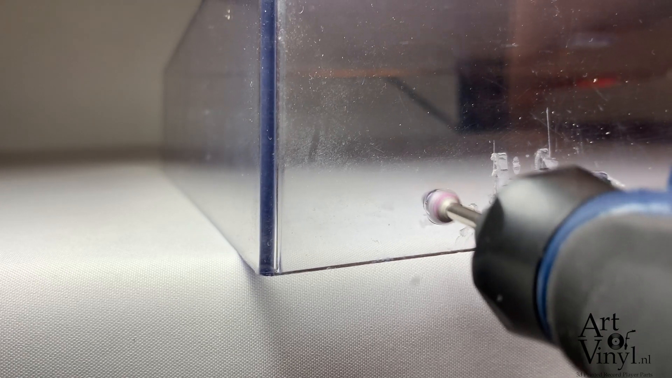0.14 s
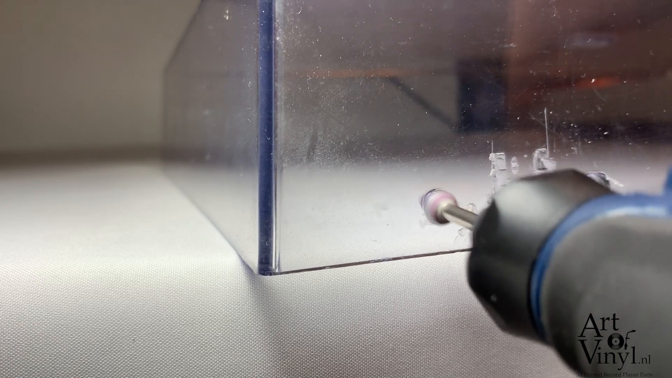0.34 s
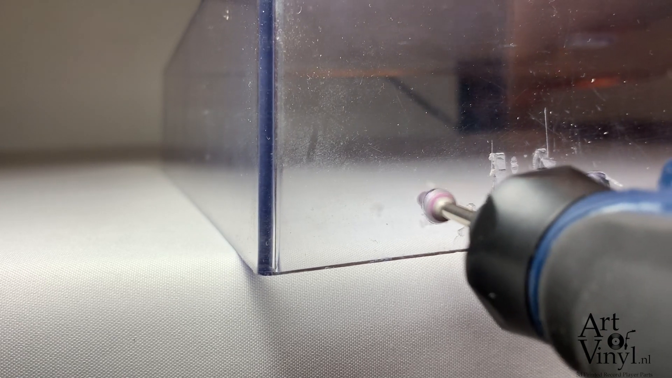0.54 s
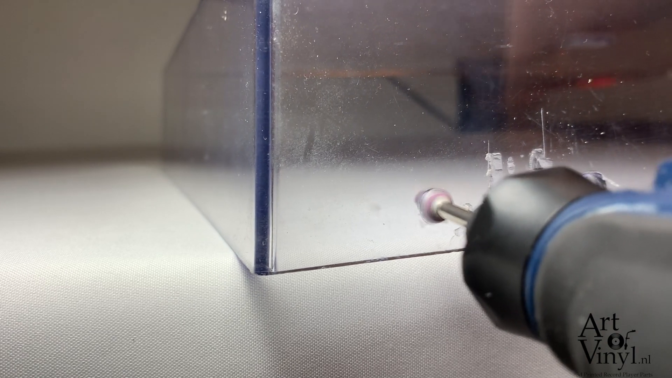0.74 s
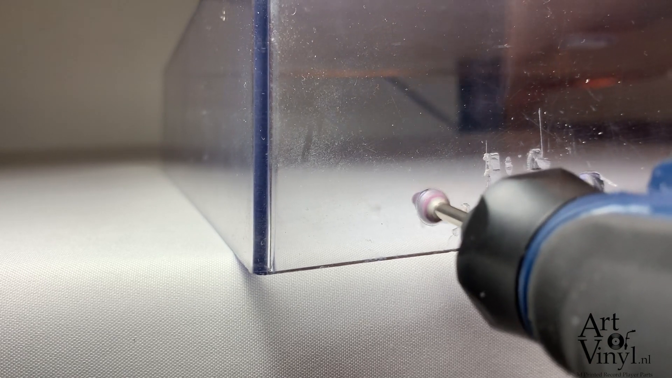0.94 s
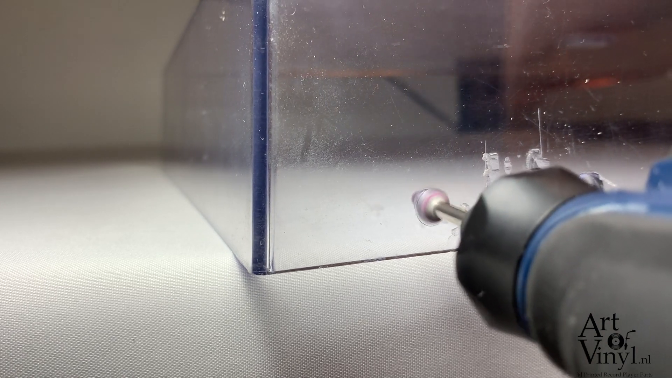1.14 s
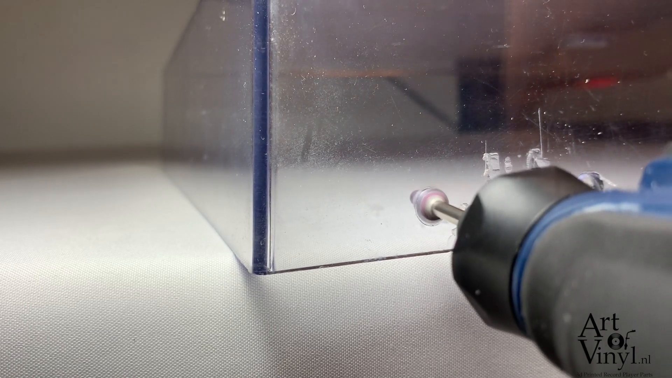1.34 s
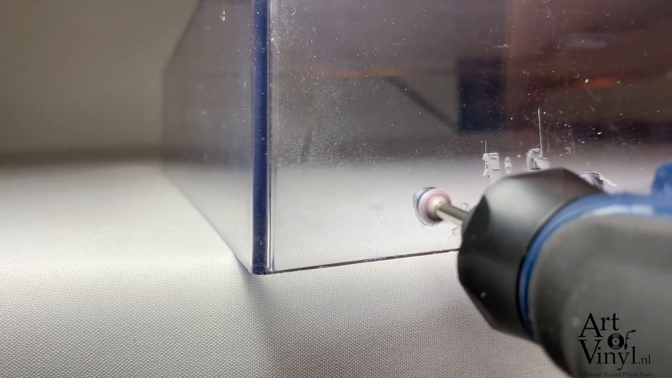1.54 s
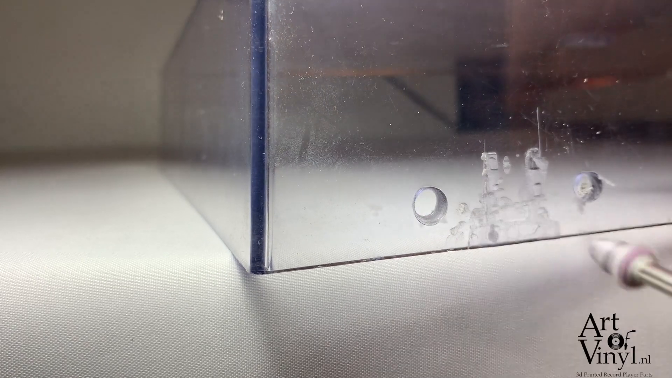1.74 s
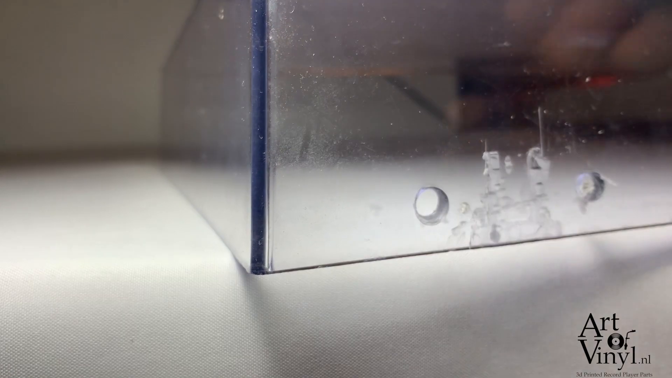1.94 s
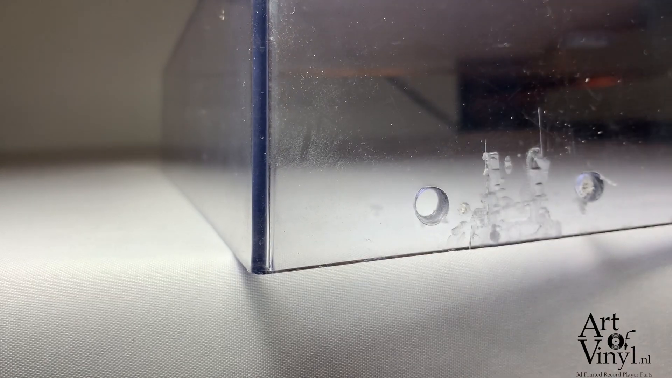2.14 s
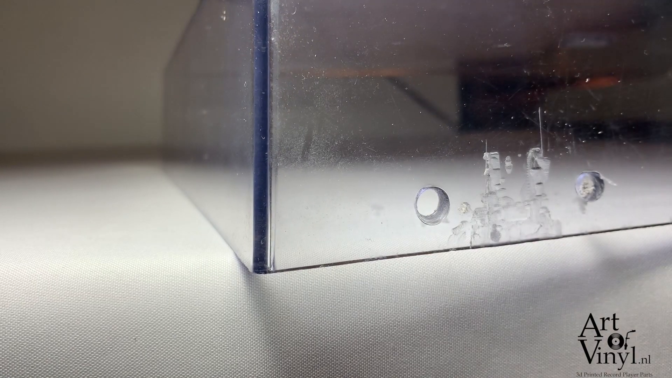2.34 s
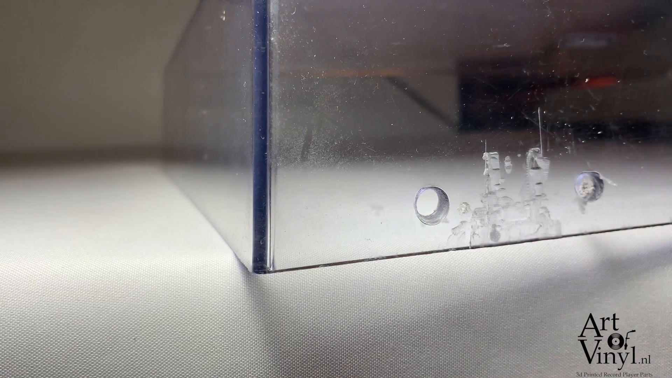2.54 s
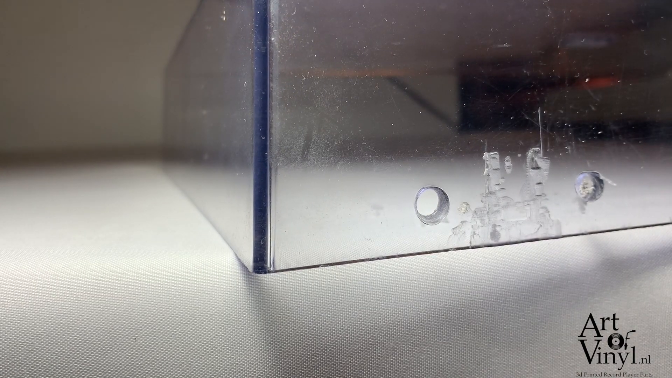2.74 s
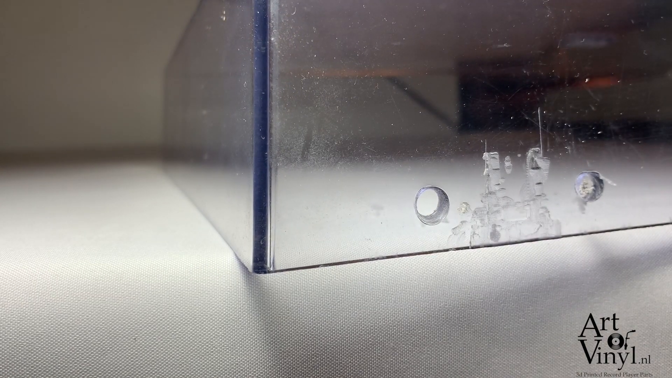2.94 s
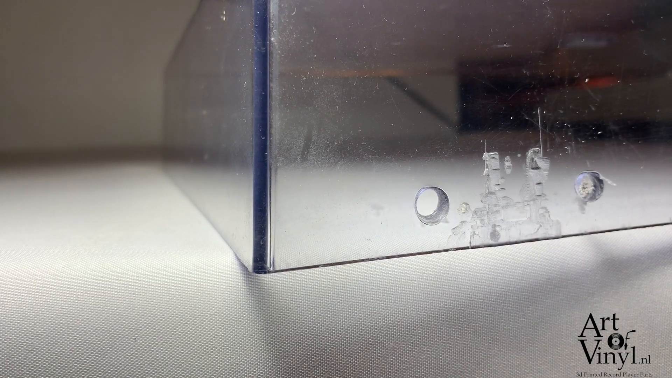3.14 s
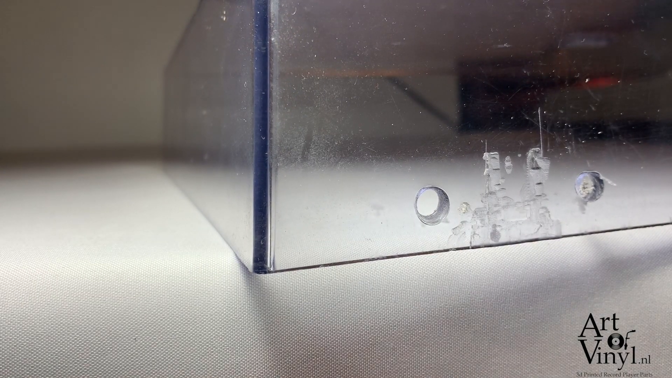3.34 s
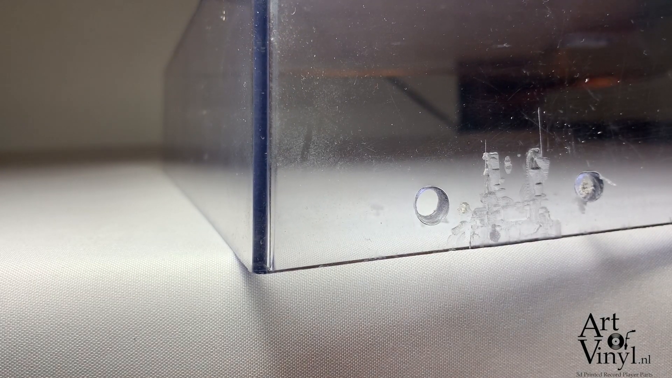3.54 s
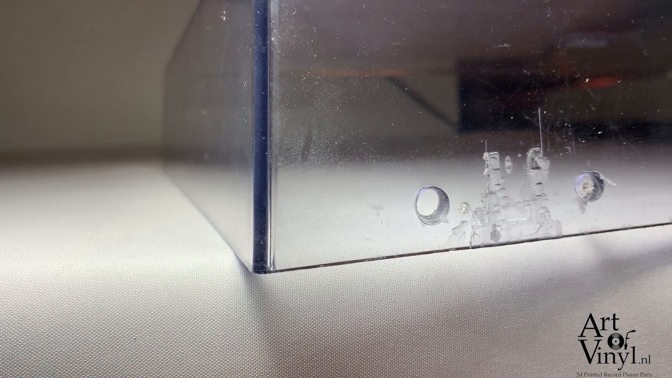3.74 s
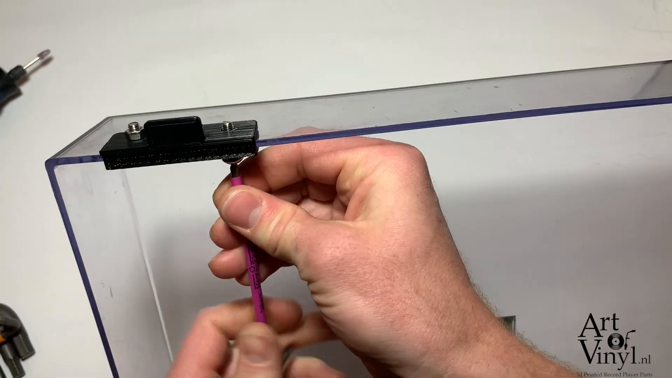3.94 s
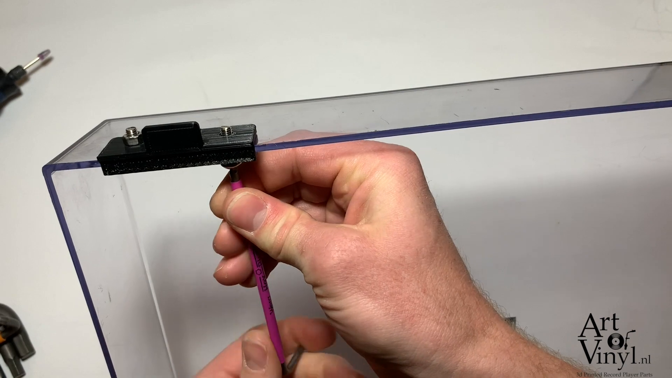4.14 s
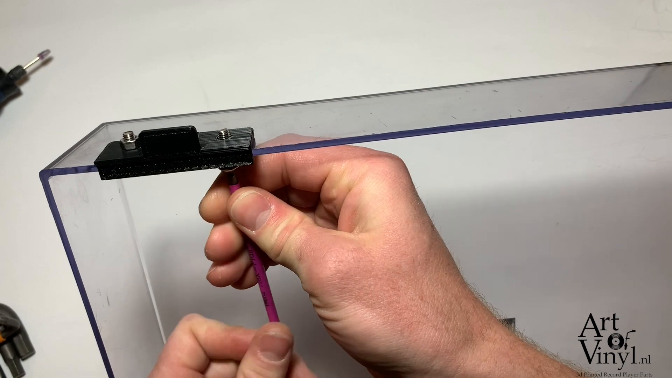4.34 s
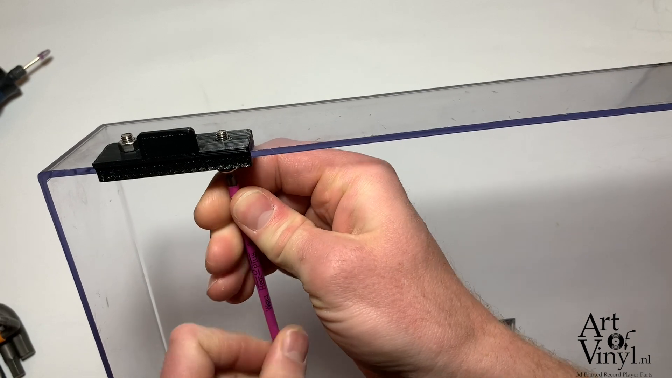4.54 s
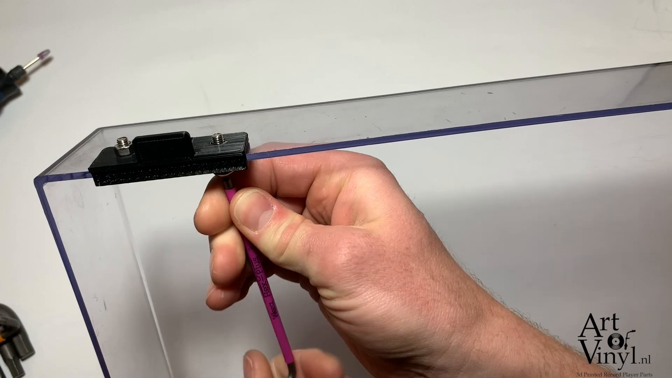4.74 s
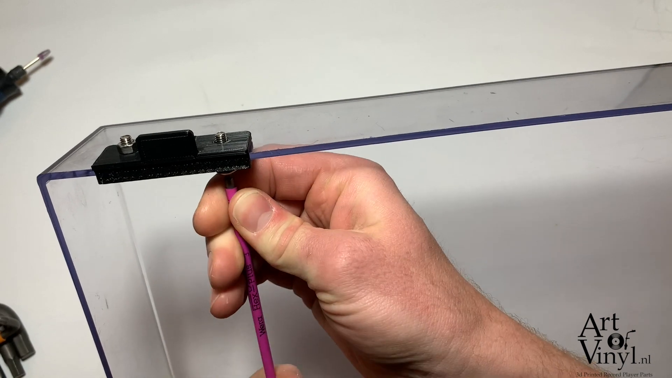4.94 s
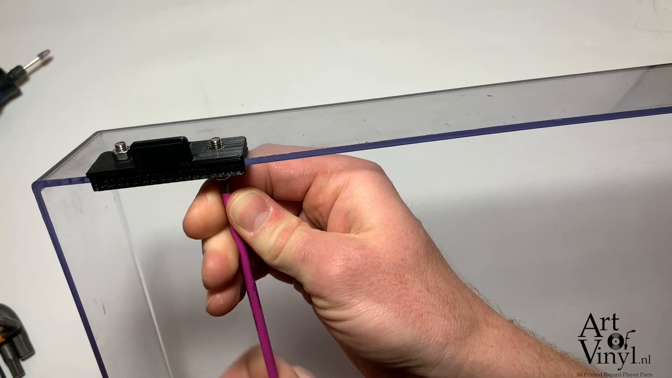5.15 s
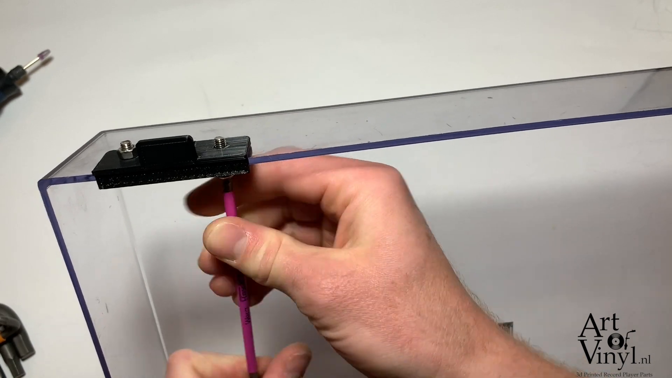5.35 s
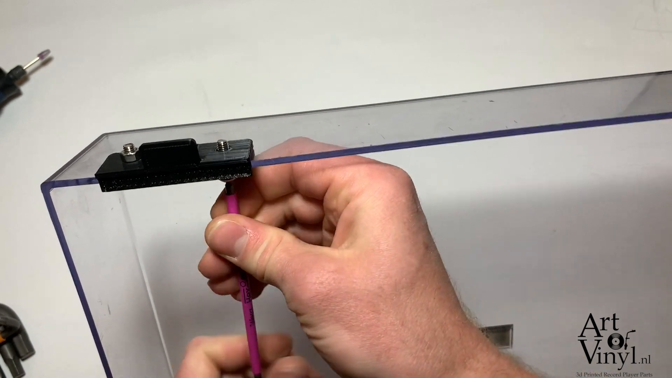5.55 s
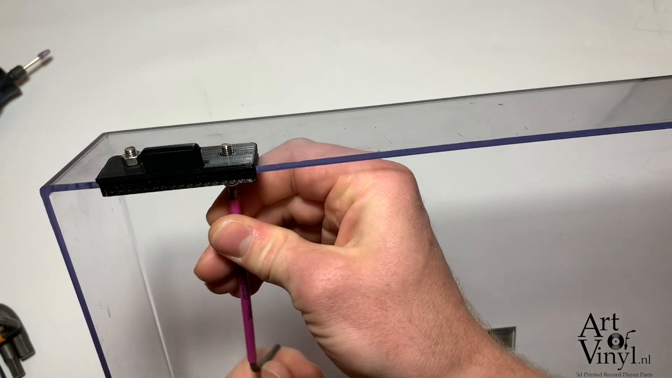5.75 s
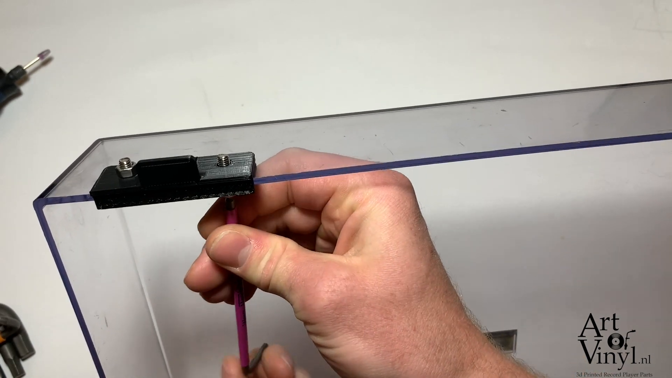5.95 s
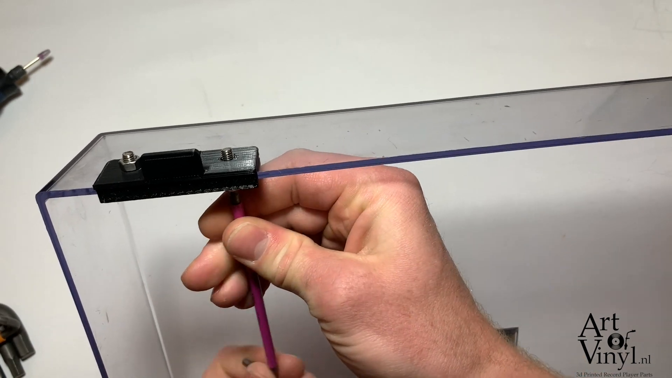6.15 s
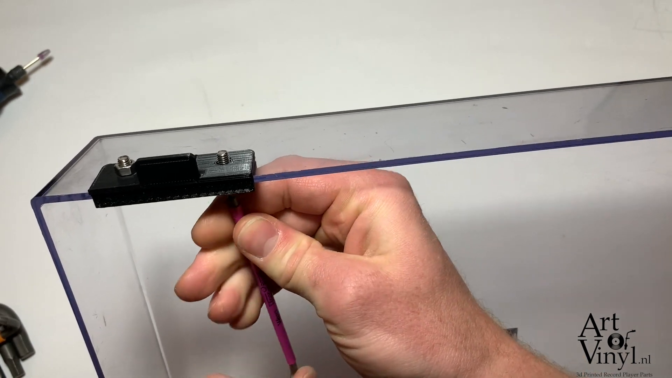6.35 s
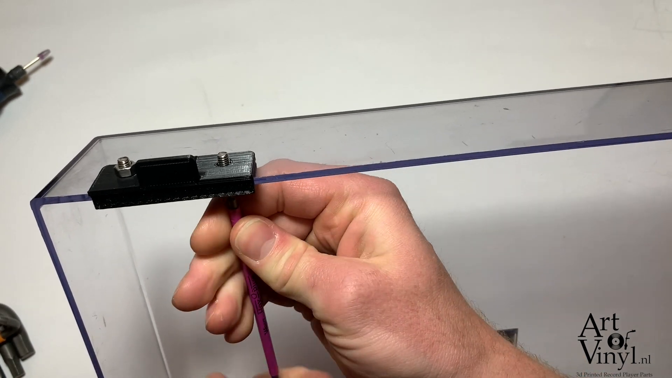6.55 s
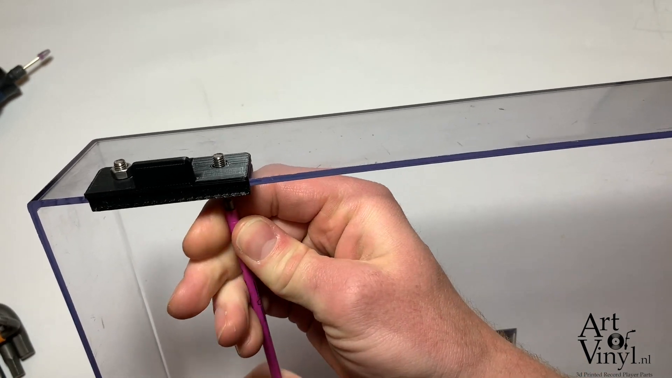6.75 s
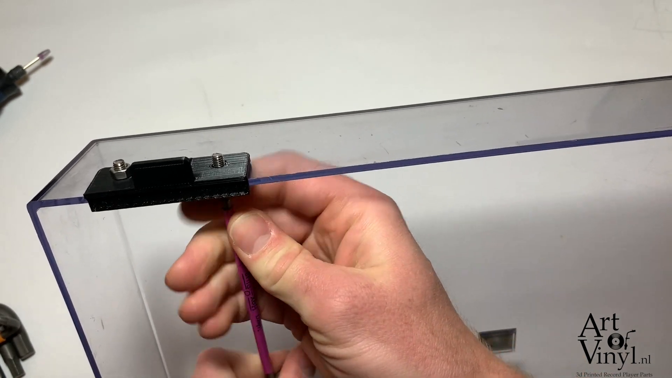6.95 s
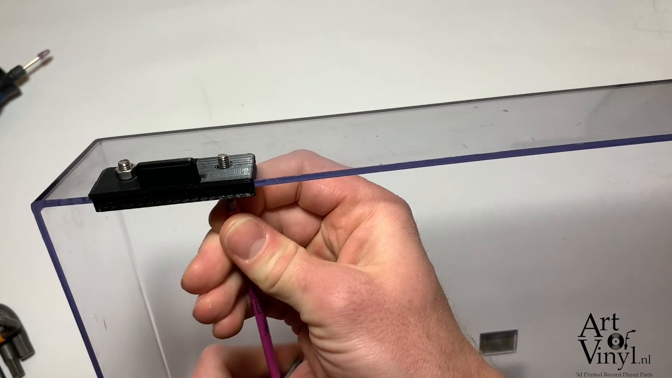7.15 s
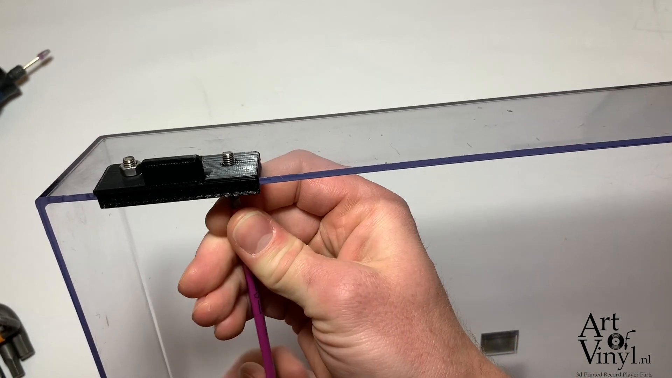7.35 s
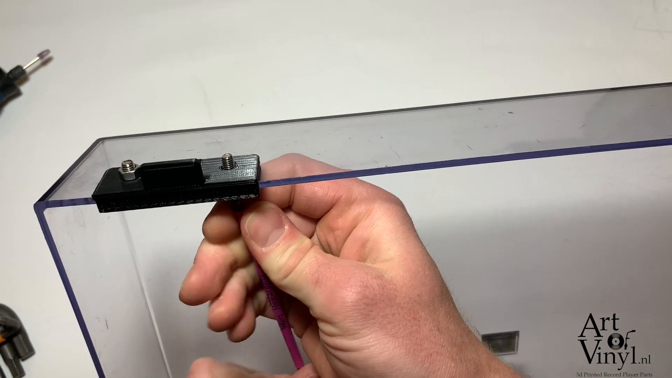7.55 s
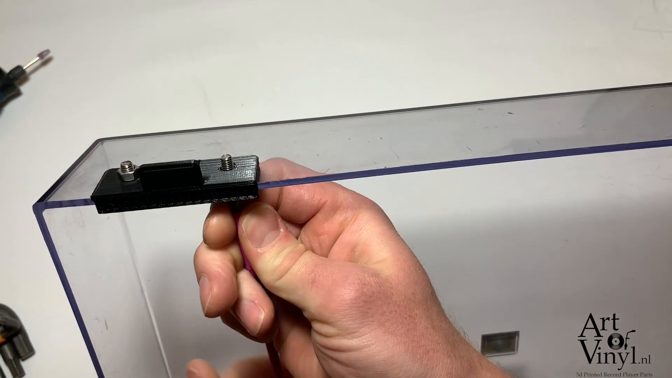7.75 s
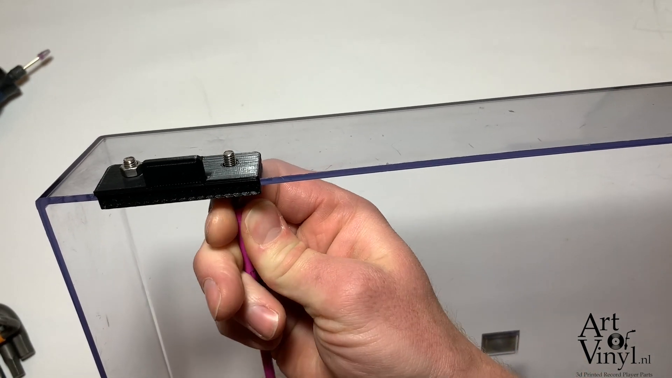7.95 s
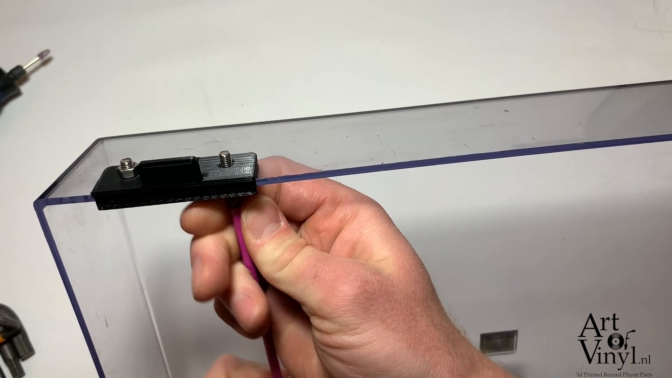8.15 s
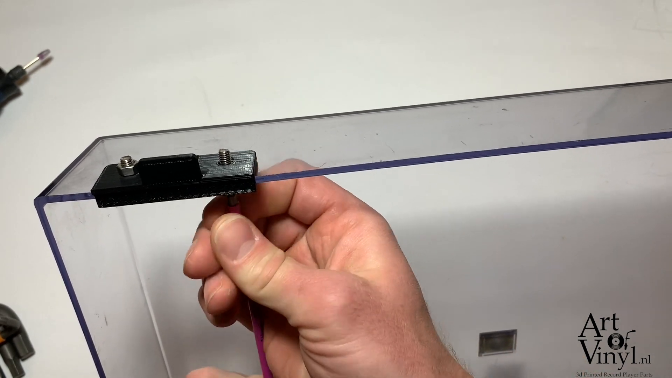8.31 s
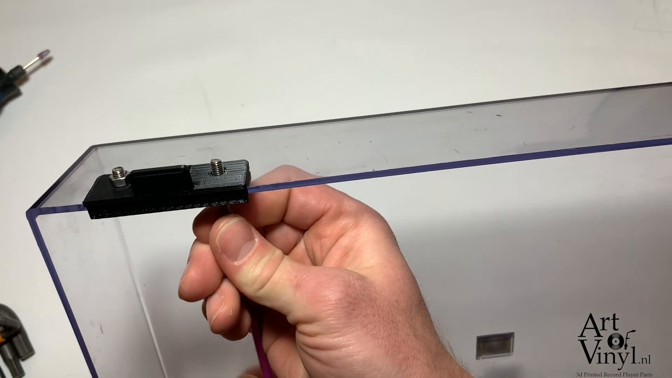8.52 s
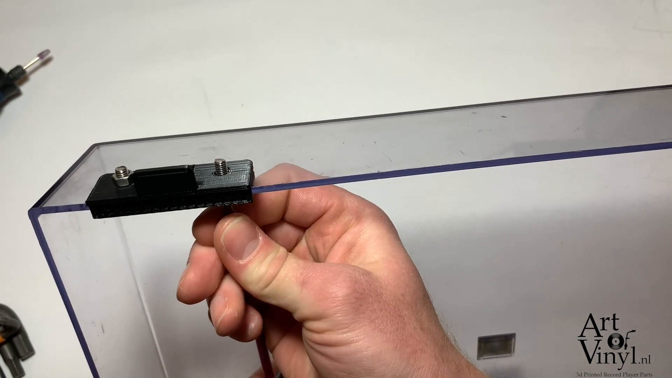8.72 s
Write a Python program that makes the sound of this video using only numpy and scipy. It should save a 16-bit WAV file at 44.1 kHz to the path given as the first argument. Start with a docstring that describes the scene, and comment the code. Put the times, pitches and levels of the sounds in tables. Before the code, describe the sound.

Close and fairly dry, a small rotary tool hums and rasps hard on hollow plastic for under two seconds, then runs free with a bright whirring whine. Power cuts, it coasts down rattling, and a slider clatters in a fast burst. After a near-silent pause, hands work a small key at a screw: faint rubbing, scrapes, dull lid knocks and steel ticks in a small quiet room.

```python
"""A quiet room with a faint hum, heard through two spaced microphones: a small rotary tool grinds a hard plastic lid.
The stone's bounces drum, rasp and hum in the lid; short bursts tear where it catches. Pulled free, the shaft whines
on its turning orders, coasts down with fan hiss and rattle, and the switch clacks over a ribbed track. Then hands
turn a hex key in a hinge screw: filtered pushes knock the lid, noise bursts tick through the steel parts, and
grainy noise rubs and scrapes."""
import sys
import numpy as np
from scipy.fft import rfft, irfft, next_fast_len
from scipy.io import wavfile
from scipy.ndimage import map_coordinates

SR = 44100
rng = np.random.default_rng(int(sys.argv[2]) if len(sys.argv) > 2 else 0)


def master(y):
    """Save y as 16-bit WAV."""
    cut = np.clip(np.atleast_2d(y).T, -1, 1)
    pcm = np.round(cut * 32767)  # scale
    wavfile.write(sys.argv[1], SR, pcm.astype(np.int16))


N = 391608
T = np.arange(N) / SR  # time [s]


def amp(db):
    """Decibels to an amplitude factor."""
    return 10 ** (np.asarray(db) / 20)


def unit(x):
    """Scale to an rms of one."""
    return x / np.sqrt(np.mean(x ** 2) + 1e-20)


def along(points, hz, axis=1):
    """A column of a table over frequency, on a log axis."""
    p = np.transpose(points)
    return np.interp(np.log(hz + 1), np.log(p[0] + 1), p[axis])


def curves(rows):
    """One value per sample for each column after the time."""
    s, *cols = np.transpose(rows)
    return [np.interp(T, s, c) for c in cols]


def wobble(rate):
    """A smooth random curve, rate knots a second."""
    coarse = T[::16]
    knots = rng.standard_normal(int(N * rate / SR) + 4)
    return np.interp(T, coarse, map_coordinates(knots, [coarse * rate]))


def filtered(x, response):
    """x through a complex response of frequency."""
    m = next_fast_len(x.shape[-1] + SR // 2)
    return irfft(rfft(x, m) * response(np.fft.rfftfreq(m, 1 / SR)), m)[..., :x.shape[-1]]


def above(corner_hz, steepness):
    """A response that passes what lies above a corner."""
    return lambda hz: 1 / (1 + (corner_hz / (hz + 1)) ** steepness)


def coloured(x, spectrum):
    """x shaped by a spectrum table, at an rms of one."""
    return unit(filtered(x, lambda hz: amp(along(spectrum, hz))))


def ringing(x, modes):
    """x through parallel resonances of alternating sign."""
    def response(f):
        return sum((-1) ** k * amp(db) * 1j * f * w / (c * c - f * f + 1j * f * w)
                   for k, (c, w, db) in enumerate(modes))
    return filtered(x, response)


def widened(modes, factor):
    """The same resonances with more or less damping."""
    return [(hz, factor * width, db) for hz, width, db in modes]


def pulses(turns, scatter_db):
    """One impulse of random size wherever the running count passes a whole number."""
    passed = np.diff(np.maximum.accumulate(np.floor(turns)), prepend=0) > 0
    return unit(passed * amp(scatter_db * rng.standard_normal(N)))


def gated(turns, sharp):
    """Noise that bursts once a cycle and dies away within it."""
    return unit(rng.standard_normal(N) * np.exp(-sharp * (turns % 1)))


def wave(turns):
    """A sine of a running count of turns."""
    return np.sin(2 * np.pi * turns)


# reflections, near surfaces and then the walls: (t60 [s], relative level [dB])
ROOM_DECAYS = [(0.058, -1), (.35, -12.5)]


def reverberated(x):
    """One noise tail for each capsule, renewed every block so that no fixed colour settles on the sound."""
    hop, m = 4096, 6 * 4096  # samples
    padded = np.pad(x, (hop, 2 * hop))
    # silent blocks are skipped
    starts = [i for i in range(0, N + hop, hop) if np.abs(padded[i:i + 2 * hop]).max() > 1e-5]
    # overlapping sine windows keep the power even
    window = np.sin(np.pi * np.arange(2 * hop) / (2 * hop))
    blocks = np.array([padded[i:i + 2 * hop] for i in starts]) * window
    t = T[:SR // 3]
    decay = sum(amp(db - 60 * t / t60) for t60, db in ROOM_DECAYS)
    tails = rng.standard_normal((len(starts), 2, len(t))) * decay / np.linalg.norm(decay)
    out = np.zeros((2, N + 3 * hop + m))
    for i, wet in zip(starts, irfft(rfft(blocks[:, None], m) * rfft(tails, m), m)):
        out[:, i:i + m] += wet
    return out[:, hop:hop + N]


TREBLE_HZ, LEAD_S = 6370, 1 / 4660  # above this the right capsule leads by a constant time


def microphones(x, place, turns):
    """Direct sound with its phase between the spaced capsules, plus the room."""
    side = np.array([[-1], [1]])  # left, right

    def share(hz):
        return np.clip(along(place, hz), 0, 1)

    def pan(hz):
        return amp(-side * along(place, hz, axis=2) / 2)

    def phase(hz):
        return np.interp(hz, *np.transpose(turns)) + np.maximum(hz - TREBLE_HZ, 0) * LEAD_S

    direct = filtered(x, lambda hz: np.sqrt(share(hz)) * pan(hz) * np.exp(1j * np.pi * side * phase(hz)))
    return direct + filtered(reverberated(x), lambda hz: np.sqrt(1 - share(hz)) * pan(hz))


# air of the empty room: (frequency [Hz], relative level per Hz [dB])
AIR = [(20, -39), (45, -4), (80, -5), (200, -10.5), (400, -14.5), (1000, -27.5), (3000, -31.5), (8000, -44),
       (12000, -30.5), (16000, -57)]
# the room's hum, before its slow unsteadiness: (frequency [Hz], rms level [dB])
HUM = [(199, -73.5), (1975, -89), (2960, -93.5)]


def room_tone():
    """Steady air noise with its own width across the capsules, and a faint wavering hum."""
    hum = sum(np.sqrt(2) * amp(db + 1.7 * wobble(21)) * wave(hz * T + 0.54 * wobble(2.7) / (2 * np.pi))
              for hz, db in HUM)
    middle, sides = [coloured(rng.standard_normal(N), AIR) for _ in range(2)]
    return amp(-65.5) * (0.74 * middle + 0.59 * sides * [[1], [-1]]) + hum


GRIP_S, GRIP_DB = 3.9, -58.5  # from here the lid is held and creaks faintly
SQUEAK_S, SQUEAK_LASTS_S, SQUEAK_DB = 3.688, .058, -68
SQUEAK_FROM_HZ, SQUEAK_TO_HZ = 5100, 7200  # start and top of the slide
SETTLE_S, SETTLE_DB = 3.3, -70  # a faint hiss until the lid is gripped
# hiss of the tool's fan: (frequency [Hz], relative level per Hz [dB])
FAN = [(200, -62), (500, -22.5), (1300, -14.5), (1800, -3.5), (2900, -5), (4000, -3), (5000, -8.5),
       (6200, -9), (7200, -13.5), (10000, -9), (16000, -14)]


def squeak():
    """A short thin whistle that slides up and droops, over a faint hiss."""
    u = np.clip((T - SQUEAK_S) / SQUEAK_LASTS_S, 0, 1)
    hz = SQUEAK_FROM_HZ + (SQUEAK_TO_HZ - SQUEAK_FROM_HZ) * np.sin(.66 * np.pi * u ** 1.3) ** 2
    swell = np.sqrt(np.abs(np.sin(np.pi * u))) * (u < 1)
    whistle = amp(SQUEAK_DB) * swell * wave(np.cumsum(hz) / SR)
    lingering = np.clip(np.minimum(T - SETTLE_S, GRIP_S - T) / .05, 0, 1)
    return whistle + amp(SETTLE_DB) * lingering * coloured(rng.standard_normal(N), FAN)


# resonances of the plastic lid: (frequency [Hz], width [Hz], relative level [dB])
LID = [(75.4, 65.7, 0), (139.3, 14, 3), (190.7, 17.2, 2), (239.7, 13.2, 0.5), (262.3, 10, -2.5),
       (298.2, 13, -0.5), (311.5, 8.2, -5.5), (370.7, 39, -5), (436.5, 25.4, -5.5), (501.8, 17, -8),
       (527, 23, -17.5), (678, 77, -15.5), (682, 20, -12), (900, 81, -23.5), (1014, 40, -16),
       (1166, 50, -21), (1216, 19, -18.5), (1296, 12, -27), (1520, 43, -29.5), (1650, 470, -32.5)]
# fingers rubbing: (frequency [Hz], relative level per Hz [dB])
RUB = [(450, 0.5), (760, -6), (1060, -12), (1380, -14), (1750, -5), (2150, -13), (2800, -28)]
# hiss of skin: (frequency [Hz], relative level per Hz [dB])
SKIN = [(1800, 11.5), (2900, 6.5), (4200, 8), (5500, -3.5), (6700, 0.5), (10000, -19), (16000, -72)]
# strokes of the hands:
# (start [s], length [s], creak in the lid [dB], rub [dB], hiss of skin [dB])
STROKES = [(3.812, 0.07, -74, -75, -67.5), (3.882, .05, -55, -66.5, -74), (3.984, 0.055, -53, -64.5, -71),
           (4.202, 0.12, -80, -64.5, -73), (4.347, 0.034, -53, -61, -72), (4.518, 0.064, -68, -70, -88),
           (4.587, 0.014, -53.5, -64, -74), (4.701, 0.022, -51.5, -62, -66),
           (4.875, 0.072, -63.5, -85, -69), (5.039, 0.25, -71, -63, -72.5), (5.287, 0.096, -45.5, -52, -61),
           (5.518, 0.19, -63, -66, -77), (5.787, 0.0493, -62, -55.5, -78),
           (5.945, 0.063, -63.5, -56.5, -63.5), (6.106, 0.16, -70, -66.5, -68.5),
           (6.31, 0.048, -46, -66, -66.5), (6.435, 0.044, -65, -67.5, -66), (6.592, 0.016, -60, -66.5, -79),
           (6.677, 0.034, -61, -58.5, -67), (6.764, 0.098, -67, -68.5, -70.5),
           (6.969, 0.11, -70, -60.5, -68.5), (7.054, 0.11, -53, -62, -51.5),
           (7.194, 0.16, -60, -60.5, -62.5), (7.354, 0.198, -73, -67.5, -64.5),
           (7.629, 0.025, -53, -71, -65), (7.823, 0.052, -56.5, -67, -71),
           (8.031, 0.085, -58, -64.5, -72.5), (8.195, 0.026, -74, -62, -59),
           (8.266, 0.027, -49, -58.5, -66), (8.342, 0.11, -58, -54, -65.5),
           (8.464, 0.248, -65.5, -61, -60.5), (8.741, 0.12, -81, -68.5, -66.5)]
STROKE_RISES, STROKE_FALL_DB_PER_S = 0.28, 251  # share of its length that a stroke takes to build up


def hands():
    """Lumpy friction in the lid, fingers rubbing, skin hissing: each stroke rises, holds and dies away."""
    gains = np.zeros((3, N))  # creak, rub, hiss
    gains[0] = amp(GRIP_DB) * np.clip((T - GRIP_S) / 0.067, 0, 1)
    for s, length, *levels_db in STROKES:
        start = round(s * SR)
        t = T[start:][:SR // 2] - s
        rise = np.clip(t / (STROKE_RISES * length), 0, 1)
        shape = rise * amp(-STROKE_FALL_DB_PER_S * np.maximum(t - length, 0))
        gains[:, start:][:, :len(t)] += amp(levels_db)[:, None] * shape

    def grain(rate, depth_db):
        return rng.standard_normal(N) * amp(depth_db * wobble(rate))

    creak = unit(ringing(grain(25, depth_db=2.0), LID))
    rub = coloured(grain(70, depth_db=3.0), RUB)
    hiss = coloured(grain(90, depth_db=2.0), SKIN)
    return gains[0] * creak + gains[1] * rub + gains[2] * hiss


SCRAPE_S, SCRAPE_PEAK_S, SCRAPE_DB = 5.52, 5.61, -52.5  # the key drags along the hinge
SCRAPE_RISE, SCRAPE_FALL = 77, 140  # slopes [dB per s]
# short scrapes of the key, some of them within the long drag: (time [s], relative level [dB])
SHORT_SCRAPES = [(3.881, -50), (3.942, -53), (3.998, -47), (4.012, -50), (4.024, -54), (4.036, -46),
                 (4.05, -55), (4.28, -51.5), (5.53, -51), (5.55, -49.5), (5.575, -47), (5.594, -44),
                 (5.612, -47.5), (5.63, -51), (7.267, -49), (7.78, -53)]


def scrape():
    """A grainy drag through the hinge's resonances, and short separate slips, during it and elsewhere."""
    slope_db = np.maximum(SCRAPE_RISE * (SCRAPE_PEAK_S - T), SCRAPE_FALL * (T - SCRAPE_PEAK_S))
    swell = np.clip((T - SCRAPE_S) / 0.013, 0, 1) * amp(SCRAPE_DB - slope_db)
    for s, db in SHORT_SCRAPES:
        swell = swell + (T > s) * amp(db - 6 - 1500 * np.abs(T - s))
    drag = rng.standard_normal(N) * amp(1.9 * wobble(120))
    hinge = ringing(drag, [(989, 230, -6.5), (1770, 470, -19)])
    return swell * unit(ringing(hinge, [(1080, 1900, 0)]))


# resonances of key and hinge: (frequency [Hz], width [Hz], relative level [dB])
KEY = [(815, 580, -4.5), (1720, 140, -2), (2230, 130, -1), (3020, 520, -4.5), (3980, 590, -2.5),
       (7040, 150, 1), (8760, 270, -3), (10400, 1700, -4), (14400, 1600, -6)]
# key on screw: (time [s], relative level [dB], t60 of the crack [s])
TICKS = [(3.502, -47.5, 0.025), (3.676, -53.5, 0.05), (3.864, -53, 0.036), (4.708, -61.5, 0.032),
         (6.145, -58, 0.041), (7.0786, -13, 0.025), (7.646, -62, 0.035), (7.8187, -52, 0.017),
         (8.0602, -54.5, 0.03), (8.2056, -52, 0.035), (8.215, -43.5, 0.049), (8.225, -44, 0.041),
         (8.236, -53, 0.04), (8.2809, -33, 0.041), (8.361, -53.5, 0.036), (8.3925, -35, 0.03),
         (8.514, -61, 0.061)]


def ticks():
    """Steel on steel: a dry crack of noise through the small parts."""
    cracks, t = np.zeros(N + SR), T[:SR // 5]
    for s, db, t60 in TICKS:
        decay = amp(db - 60 * t / np.clip(t60, .005, .3))
        cracks[round(s * SR):][:len(t)] += decay * rng.standard_normal(len(t))
    return amp(2.0) * ringing(cracks[:N], KEY)


# knocks on the lid, hollow middle and hard edge being over the thud's drive:
# (time [s], relative level [dB], hollow middle [dB], hard edge [dB])
KNOCKS = [(3.877, -38.5, 6, -10.5), (3.890, -36, -12, -21), (3.996, -48.5, -7, 0), (4.011, -51, -6, 0),
          (4.035, -46, 0, 0.5), (4.368, -48, -3, -23), (4.512, -48.5, 2, -9), (4.532, -48, -1, -2),
          (4.601, -45, 5, 1.5), (4.612, -36.5, 3, -30), (4.63, -37, -0.5, -18.5), (4.707, -49, 2, -3),
          (4.724, -35.5, 1.5, -13), (4.92, -36.5, -11, -32), (5.045, -43.5, 4, -7), (5.278, -43, -4, 12.5),
          (5.297, -31, -3, -30), (5.329, -25.5, 8, -30), (5.352, -31, -7, -30), (5.372, -37, 3.5, -30),
          (5.492, -48.5, 0, -1), (5.527, -53, 4, 3), (5.719, -53.5, 0, -13), (5.949, -47, 1, -13),
          (5.974, -51, 0, -18.5), (6.143, -54, -5, 1), (6.213, -57, -5, -12), (6.295, -24, 7, -42),
          (6.349, -38, 7.5, -17), (6.589, -46, -5, -2), (6.684, -44.5, 1, -12), (6.923, -43.5, 3.5, -8.5),
          (7.079, -39, 1, 10), (7.579, -28, -2, -38), (7.606, -37, -11, -32), (7.647, -40, -1, -6),
          (7.777, -57, -1, 0), (7.819, -42.5, -1, 3.5), (8.057, -40, 4, -13), (8.246, -27.5, 2.5, -33),
          (8.283, -36, 1, -12), (8.361, -43, 4, 3)]


def knocks():
    """Pushes on the lid, each a soft thud and a hard edge; bending waves bring the highs first."""
    thuds, hollows, edges, t = *np.zeros((3, N + SR)), T[:SR // 20]
    for s, db, hollow_db, edge_db in KNOCKS:
        push = 0.14 * rng.standard_normal(len(t)) * amp(-60 * t / 0.037)
        push[0] += 1
        push = push / np.linalg.norm(push)
        for layer, over_db in [(thuds, 0), (hollows, hollow_db), (edges, edge_db)]:
            layer[round(s * SR):][:len(t)] += amp(db + over_db) * push

    def highpass(hz, corner_hz, order):
        return (1j * hz / corner_hz) ** order / (1 + 1j * hz / corner_hz) ** order

    def soft(hz):
        spread = np.exp(-1j * 0.62 * (np.sqrt(hz + 1) - hz / 95))
        return spread * highpass(hz, 230, 2) / (1 + 1j * hz / 660) ** 6

    def hard(hz):
        sweep = np.exp(-4.5j * (np.sqrt(hz + 1) - hz / 80))  # the edge arrives as a falling chirp
        rolloff = (1 + 1j * hz / 450) * (1 + 1j * hz / 3000) ** 3
        return sweep * highpass(hz, 170, 2) / rolloff / (1 - (hz / 1200) ** 2 + 1j * hz / 1500)

    hollow = filtered(hollows[:N], lambda hz: soft(hz) * highpass(hz, 170, 3))
    thud = filtered(thuds[:N], lambda hz: soft(hz) / (1 + 1j * hz / 330) ** 3) + hollow
    body = ringing(thud, widened(LID, 0.88))  # the lid as the hands hold it
    prompt = ringing(hollow, widened(LID, 3.5))  # the first push, before the modes build up
    return amp(55.0) * body + amp(43.5) * prompt + amp(39.5) * filtered(edges[:N], hard)


# resonances around the switch: (frequency [Hz], width [Hz], relative level [dB])
SWITCH = [(1880, 340, -4.5), (3000, 840, -9.5), (4600, 1100, -1), (5750, 1400, -2), (6960, 1700, -8),
          (9500, 950, -7), (11400, 1100, -4.5), (14700, 2100, -9.5)]
# the slider's clacks: (time [s], relative level [dB])
RIBS = [(3.0967, -26.5), (3.1078, -26.5), (3.1124, -24.5), (3.1178, -21.5), (3.123, -21), (3.129, -16.5),
        (3.135, -16), (3.1415, -18), (3.1467, -18.5), (3.1537, -13.5), (3.1593, -17), (3.1673, -13.5),
        (3.1743, -14.5), (3.1814, -21), (3.1903, -19.5), (3.1976, -21.5), (3.2047, -17.5), (3.2138, -17.5),
        (3.2232, -27.5)]
SLIDER_HZ, SLIDER_RISE_HZ_PER_S = 3560, 2300  # its own ring rises along the track
SLIDER_DB, SLIDER_FADES_DB_PER_S, SLIDER_T60_S = -4, 30, .011
SLIDER_UPPER_HZ, SLIDER_UPPER_DB = 5600, -16.5


def switch():
    """The slider clacks over each rib: a short burst in the housing and the slider's own ring."""
    bursts, rings, t = np.zeros(N), np.zeros(N), T[:SR // 50]
    for s, db in RIBS:
        start, along_s = round(s * SR), s - RIBS[0][0]
        clack = amp(-60 * t / 0.008) * rng.standard_normal(len(t))
        bursts[start:][:len(t)] += amp(db + 23.0) * clack / np.linalg.norm(clack)
        hz = (SLIDER_HZ + SLIDER_RISE_HZ_PER_S * along_s) * (1 + 0.016 * rng.standard_normal())
        ring_db = db + SLIDER_DB - SLIDER_FADES_DB_PER_S * along_s - 60 * t / SLIDER_T60_S
        rings[start:][:len(t)] += amp(ring_db) * wave(hz * t)
        upper_hz = SLIDER_UPPER_HZ * (1 + .03 * rng.standard_normal())
        upper_db = db + SLIDER_UPPER_DB - 90 * t / SLIDER_T60_S
        rings[start:][:len(t)] += amp(upper_db) * wave(upper_hz * t)
    return rings + filtered(ringing(bursts, SWITCH), above(1500, 8))


# the switch-off click, then the hardest rattles: (time [s], relative level [dB], ring [Hz])
HARD_SOUNDS = [(2.66, -23, 6000), (2.6906, -24, 3000), (2.6997, -22, 3100), (2.762, -24, 3000),
               (2.773, -24, 3000), (2.8397, -24, 3200), (2.886, -24.5, 3100), (2.9198, -23, 3050),
               (2.935, -25.5, 3000), (2.9994, -31.5, 2900)]


def click_and_hard_rattles():
    """Single hard sounds: a crack and a short ring."""
    out, t = np.zeros(N), T[:SR // 50]
    for s, db, hz in HARD_SOUNDS:
        hit = .7 * wave(hz * t) + 0.45 * rng.standard_normal(len(t))
        out[round(s * SR):][:len(t)] += amp(db - 60 * t / .02) * hit
    return filtered(out, above(1500, 8))


FREE_S, LOADED, IDLE, SPIN_UP_S = 1.62, 86, 103.6, .052  # pulled free; turns per s; time constant
CREEP, CREEP_S, HUNT = 1.2, .2, .25  # the last turns per s come slowly; the speed hunts by this much
OFF_S, COAST_S, DRAG = 2.67, 1.02, 62  # power off; time constant and dry friction [turns per s]


def shaft():
    """Turns per second: loaded, spinning up when free, coasting down against friction."""
    free = np.maximum(T - FREE_S, 0)
    lag = (IDLE - LOADED) * np.exp(-free / SPIN_UP_S) + CREEP * np.exp(-free / CREEP_S)
    running = IDLE - lag + HUNT * wobble(8)
    coast = np.exp(-np.maximum(T - OFF_S, 0) / COAST_S)
    return np.maximum((running + DRAG) * coast - DRAG, 0)


# clean orders of the shaft: (multiple of the turning rate, relative level [dB])
ORDERS = [(1, -30.5), (2, -14.5), (4, -28), (5, -28), (6, -29.5), (7, -11), (8, -27.5), (9, -27), (10, -32),
          (11, -14), (12, -18), (13, -23), (14, -28), (15, -22.5), (17, -20), (18, -15.5), (20, -25.5),
          (22, -12), (25, -19.5), (26, -16.5), (27, -16.5), (31, -21.5), (34, -21.5), (42, -25.5),
          (47, -20)]
# how well the tool radiates its tones: (frequency [Hz], relative level [dB])
CARRY = [(150, -1), (400, -4), (600, -2), (750, -2.5), (1000, 1.5), (1300, 0.5), (1800, 7), (2300, 1.5)]
# resonances of the tool's housing: (frequency [Hz], width [Hz], relative level [dB])
HOUSING = [(1730, 290, 1), (2130, 330, -1), (2710, 250, -3), (3320, 500, -3.5), (3830, 990, -3),
           (4940, 440, -5)]
# the whine through the run, with knock and rattle being over the whirr:
# (time [s], shaft tones relative [dB], whirr [dB], housing knock [dB], bearing rattle [dB])
WHINE = [(1.5, -80, -43, -6.5, -25), (1.62, -43, -37.5, -6.5, -22.5), (1.72, -39.5, -34, -11.5, -23),
         (1.9, -39, -33.5, -6.5, -24), (2.2, -48.5, -36, -4, -12), (2.4, -47, -35, -6.5, -10),
         (2.66, -48, -33, -9.5, -5.5), (2.8, -49.5, -35.5, -5.5, -6), (2.93, -57, -35, -8, -4),
         (3.0, -58, -39, -9, -6.5), (3.07, -60.5, -41.5, -8, -10), (3.25, -77, -50, -6.5, -13.5),
         (3.4, -110, -72.5, -6, -13), (3.5, -140, -130, -8, -14)]
# the rattle's ring rises as the tool is turned, around RATTLE_MOVES_S
RATTLE_FROM_HZ, RATTLE_TO_HZ, RATTLE_MOVES_S = 2700, 3160, 2.4


def motor():
    """Clean shaft orders; a knock each turn rings the housing; the fan hisses in step with the shaft."""
    speed, (tone_db, whirr_db, knock_db, rattle_db) = shaft(), curves(WHINE)
    turns = np.cumsum(speed) / SR
    tones = np.zeros(N)
    for k, db in ORDERS:
        carry_db = along(CARRY, k * speed) - along(CARRY, k * IDLE)
        tones += amp(db + carry_db + 0.61 * wobble(11.0)) * wave(k * turns + rng.random())
    steady = np.clip(speed / 103, 0, 1) ** 2
    beat = pulses(turns + 0.006 * wobble(40), scatter_db=1.0) + 0.2 * gated(turns, sharp=1.4)
    knock = unit(filtered(ringing(beat * (T < 3.4), HOUSING), above(1450, 6)))
    # the shaft rattles in its bearing
    loose = gated(turns + 0.12 * wobble(50), sharp=2.3) * amp(2.2 * wobble(60))
    moved = np.clip(.5 + (T - RATTLE_MOVES_S) / .3, 0, 1)
    rattle = sum(share * unit(ringing(loose, [(1720, 280, -9.5), (hz, 420, 0.5)]))
                 for share, hz in [(1 - moved, RATTLE_FROM_HZ), (moved, RATTLE_TO_HZ)])
    # a growl is strongest where the shaft is slow
    growl = (1 - steady) ** 2 * unit(ringing(rng.standard_normal(N), [(930, 320, 0)]))
    fan = coloured(gated(2 * turns, sharp=0.63) * amp(0.73 * wobble(70)), FAN)
    whirr = amp(knock_db) * knock + amp(rattle_db) * rattle + 0.41 * growl + (0.68 + 0.19 * steady) * fan
    whirr = amp(whirr_db + 0.53 * wobble(18)) * whirr
    return amp(tone_db + 9.5) * tones + whirr + click_and_hard_rattles()


# hiss of grit under the stone: (frequency [Hz], relative level per Hz [dB])
GRIT = [(900, -2), (1600, -1.5), (2500, -4.5), (3500, -3), (5000, -8.5), (6000, -12), (7200, -7),
        (9000, -7.5), (10500, -9.5), (16000, -12.5)]
# the stone catches: (time [s], relative level [dB])
BITES = [(0.064, -19.5), (0.132, -17), (0.5194, -13.5), (0.5944, -11), (0.6825, -15.5), (0.688, -14.5),
         (0.741, -19.5), (0.7821, -14.5), (0.8105, -15.5), (0.816, -14.5), (0.877, -17), (0.9082, -16),
         (0.955, -19), (0.97, -19), (1.012, -17), (1.1435, -13), (1.19, -12), (1.3144, -12), (1.321, -18.5),
         (1.3722, -18), (1.408, -23.5), (1.4661, -22.5), (1.5618, -21.5), (1.5947, -21)]
NIBBLES_PER_S, NIBBLE_DB = 55, -22  # smaller catches in between, on average


def bites():
    """Short tearing bursts where the stone catches an edge of the hole."""
    swell, t = np.zeros(N), T[:SR // 20]
    draw = rng.random(size=(130, 2))
    times = np.cumsum(.5 + draw[:, 0]) / NIBBLES_PER_S
    levels_db = NIBBLE_DB + 9 * (draw[:, 1] - .5)
    nibbles = [(s, db) for s, db in zip(times, levels_db) if s < FREE_S]
    for s, db in BITES + nibbles:
        swell[round(s * SR):][:len(t)] += amp(db - 60 * t / 0.014) * (1 - np.exp(-t / 0.00058))
    return amp(0.5) * swell * coloured(rng.standard_normal(N), GRIT)


# the stone bouncing on the lid:
# (time [s], bounces per second [Hz], pressure [dB], relative level of the octave [dB])
CHATTER = [(0, 88.7, -22.5, -29), (.3, 87.8, -23, -35), (.48, 85.5, -23, -39.5), (.56, 98, -23.5, -33.5),
           (.6, 91.3, -23.5, -21.5), (1, 103.5, -24, -28), (1.2, 108, -24, -29), (1.31, 123, -25, -32),
           (1.41, 113, -28, -33), (1.47, 104, -27, -26.5), (1.56, 87, -28, -40.5), (1.63, 52, -32.5, -58),
           (1.7, 69, -55, -70.5)]
# hum of the three-bounce pattern: (thirds of the bounce rate, relative level [dB])
THIRDS = [(5, -27.5), (8, -24), (9, -29), (11, -25), (12, -34.5), (15, -29), (17, -32.5), (23, -35),
          (28, -36.5), (34, -31.5), (42, -39.5), (45, -38)]
SING_ENDS_S, SING_WAVER_DB, SING_BLUR = .565, -0.7, 0.0095  # end; unsteadiness in level and in turns


def singing():
    """While the stone digs in, its bounces lock into a pattern of three; the lid hums on thirds of their rate."""
    turns = np.cumsum(curves(CHATTER)[0]) / SR + SING_BLUR * wobble(30)
    on = np.clip((SING_ENDS_S - T) / 0.013, 0, 1)
    return on * sum(np.sqrt(2) * amp(db + SING_WAVER_DB * wobble(20)) * wave(k * turns / 3 + rng.random())
                    for k, db in THIRDS)


# the stone leaves the lid: (time [s], half length [s], drop [dB], scaled for each layer)
LIFTS = [(1.364, 0.026, 9), (1.43, 0.028, 12), (1.518, 0.0088, 7)]
TONE_DB, DRUM_DB, RASP_DB, GRIT_DB = 0.5, 1.5, -1.5, -7  # over the starting pressure
TONE_FOLLOWS, RASP_FOLLOWS, GRIT_FOLLOWS = 1, 3.6, 0.25  # dB for each dB that the pressure eases
SING_DRUM_DB, THIRD_DB = 0.5, -3.5  # added to the drum while singing; third order over the octave
# the stone rocks in the hole: a strong crest, how long it stays strong,
# the rate there [per s], and how fast the rate falls before it [per s, each s]
ROCK_S, ROCK_LASTS_S, ROCK_PER_S, ROCK_SLOWS = 1.095, .17, 15, 9.6
# swing of each layer, scaled by the strength of the rocking; the tone lags behind
ROCK_OCTAVE_DB, ROCK_TONE_DB, ROCK_RASP_DB, TONE_LAGS_S = 9, 3, 3, 0.018


def grinding():
    """Uneven bounces of the stone drum the lid; grit rasps at each bite."""
    rate, press_db, octave_db = curves(CHATTER)
    start_db = press_db[0]
    eased_db = press_db - start_db
    crest = np.exp(-((T - ROCK_S - .04) / ROCK_LASTS_S) ** 2)
    swing = (T > SING_ENDS_S) * (0.73 + 0.84 * crest)

    def rock(lag):
        t = T - ROCK_S - lag
        sway = ROCK_PER_S * t - ROCK_SLOWS * np.minimum(t, 0) ** 2 / 2
        return swing * np.cos(2 * np.pi * sway)

    lift_db = -sum(db * np.exp(-((T - s) / half) ** 2) for s, half, db in LIFTS)
    on = np.clip((1.685 - T) / 0.036, 0, 1)
    turns = np.cumsum(rate) / SR

    def order(k, level_db, phase_rad):
        return np.sqrt(2) * amp(level_db) * np.sin(2 * np.pi * k * turns + phase_rad)

    tone_db = start_db + TONE_DB + TONE_FOLLOWS * eased_db + ROCK_TONE_DB * rock(TONE_LAGS_S) + 0.28 * lift_db
    tone = order(1, tone_db + 0.71 * wobble(35), 0.18 * wobble(15))
    tone += order(2, octave_db + ROCK_OCTAVE_DB * rock(0) + 1.7 * wobble(25), 0.27 * wobble(25))
    tone += order(3, octave_db + THIRD_DB + 5.3 * wobble(25), 0.38 * wobble(25))

    loose = turns + .12 * wobble(70)  # bounces come early or late
    force = (.7 * pulses(loose, scatter_db=-3) + .6 * gated(loose, sharp=1.2)) * on

    def level(v):
        return v / np.sqrt(np.mean(v[:SR] ** 2))  # rms of one over the first second

    drum = level(filtered(ringing(force, LID), lambda hz: above(130, 8)(hz) / (1 + (hz / 580) ** 8)))
    broad = ringing(force, widened(LID, 1.36))  # the stone's touch damps the modes
    rasp = level(filtered(broad, above(580, 8)))
    uneven = amp(1.7 * wobble(45) + 1.1 * wobble(300))
    grit = coloured(gated(loose, sharp=0.71) * uneven, GRIT)

    drum_db = DRUM_DB + SING_DRUM_DB * (T < SING_ENDS_S) + eased_db + 0.33 * lift_db
    rasp_db = RASP_DB + RASP_FOLLOWS * eased_db + ROCK_RASP_DB * rock(0) + 0.5 * lift_db
    grit_db = GRIT_DB + GRIT_FOLLOWS * eased_db + lift_db
    rough = amp(drum_db) * drum + amp(rasp_db) * rasp + amp(grit_db) * grit
    return on * (tone + amp(start_db) * rough)


# each place as the microphones hear it:
# (frequency [Hz], direct share of the power [0-1], left over right [dB])
AT_LID = [(60, 0.92, 1.5), (262, 0.89, 2), (606, 0.2, 1.5), (2500, 0.87, 5), (5550, 0.1, 0.5),
          (8080, 1, -1.5), (16000, 0, 1)]
AT_STONE = [(600, .7, 1.5), (2500, 0.82, 5.5), (5300, 0.52, 0), (16000, .75, .5)]
AT_TOOL = [(60, 1, -3), (400, .9, 1.5), (684, 1, 10.5), (1300, 0.91, 6.5), (2430, 0.54, 4.5),
           (4400, 0.65, 4), (7800, 1, -0.5), (15950, 0.99, 1)]
AT_SWITCH = [(58.8, 0.94, -6.5), (1300, .9, 4), (2430, 0.62, 8.5), (4400, 0.72, 6.5), (7800, 0.85, -2.5),
             (15950, 0.98, 3)]
AT_KNOCKS = [(60, .94, .8), (305, 0.93, 2.6), (700, 0.51, 4.8), (2100, 0.32, 1.2), (6000, 1, .5)]
AT_HANDS = [(60, 0.94, 0.84), (305, 0.89, 1.3), (672, 0.29, 5.7), (2125, 0.091, 1.3), (3440, 0.5, 1.6),
            (5660, 0.14, 0.5), (6840, 0.81, 0.36), (16000, 0.94, 0.34)]
# phase of the right capsule against the left, below the treble: (frequency [Hz], phase [turns])
LID_TURNS = [(0, 0), (170, -.07), (690, -.3), (1200, -.7), (2240, -.86), (3270, -1.45), (4300, -1.6),
             (5340, -2.15), (6370, -2)]
TOOL_TURNS = [(0, 0), (170, .06), (690, .4), (1720, .44), (2750, .1), (3800, -.4), (5340, -.95),
              (5900, -1.45), (6370, -1.2), (7400, -1.1), (7900, -1)]
HAND_TURNS = [(0, 0), (1200, .05), (2750, -.2), (4300, -.28), (6370, 0)]


def scene():
    """Every source at its place before the two microphones, over the room tone."""
    out = room_tone()
    out = out + microphones(ticks() + scrape() + hands(), AT_HANDS, HAND_TURNS)
    out += microphones(knocks(), AT_KNOCKS, HAND_TURNS)
    out += microphones(switch(), AT_SWITCH, TOOL_TURNS)
    out += microphones(motor() + squeak(), AT_TOOL, TOOL_TURNS)
    out += microphones(bites(), AT_STONE, LID_TURNS)
    out += microphones(grinding() + singing(), AT_LID, LID_TURNS)
    return out


TOP_HZ = 15850  # band limit


def record(dry):
    """The capsules lose the deepest bass; nothing is kept above the band limit."""
    return filtered(dry, lambda hz: (hz < TOP_HZ) * ((1j * hz / 32) / (1 + 1j * hz / 32)) ** 2)


dry = scene()
out = record(dry)
master(out)
```